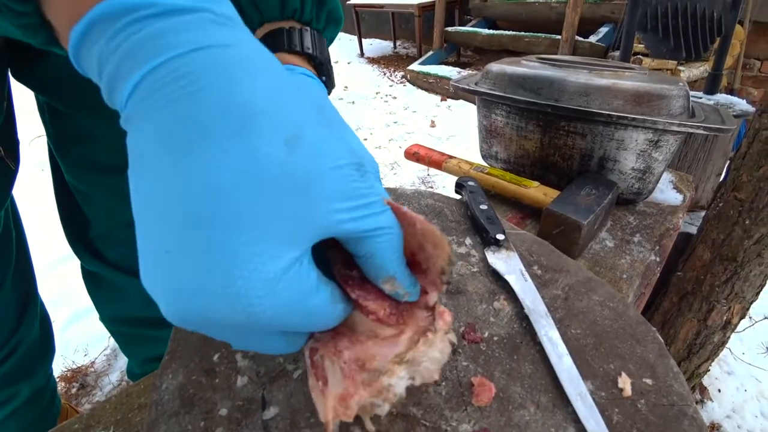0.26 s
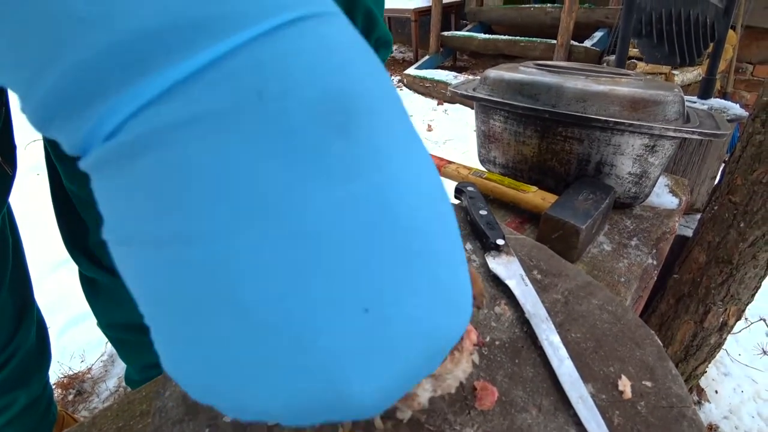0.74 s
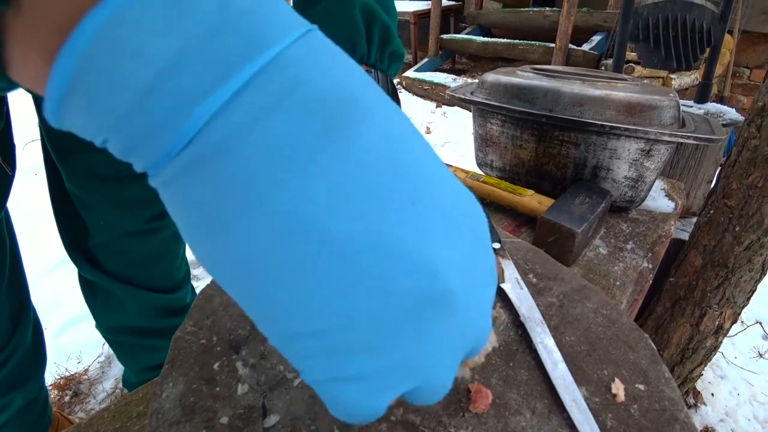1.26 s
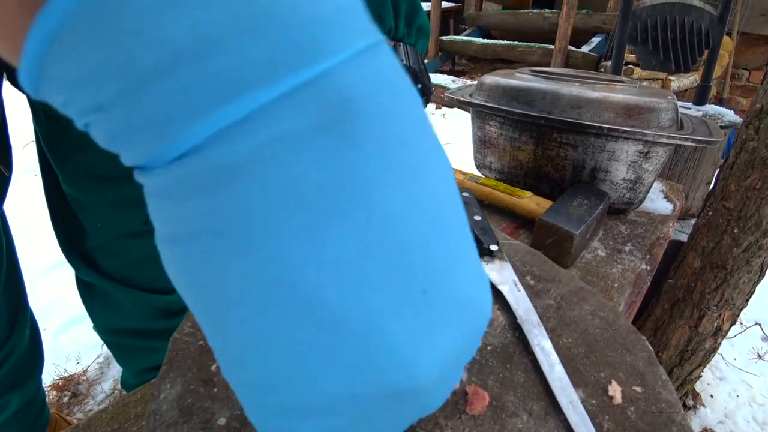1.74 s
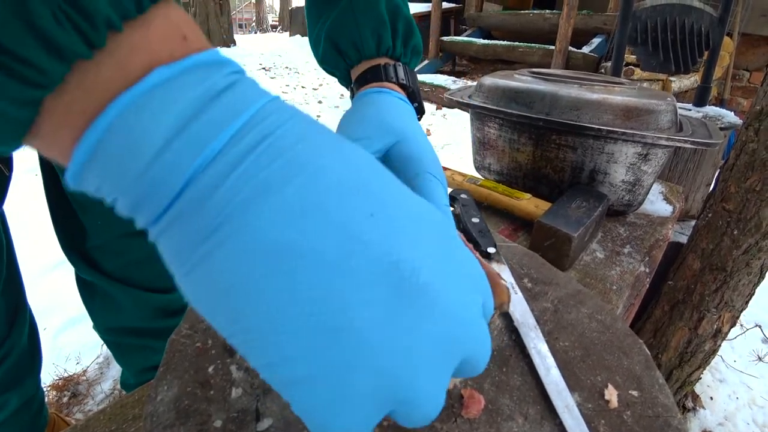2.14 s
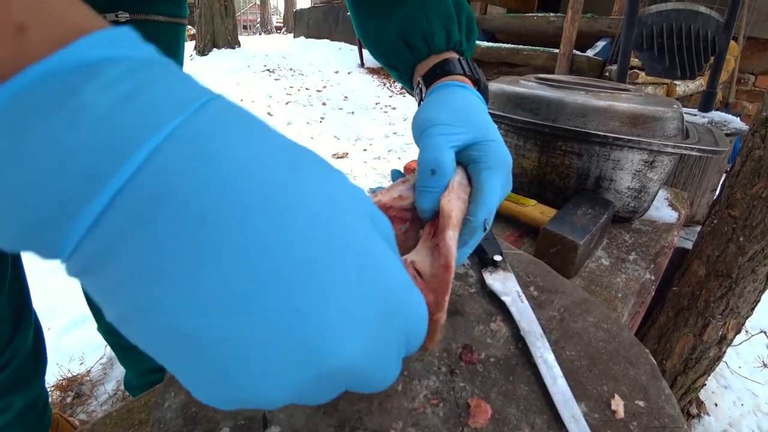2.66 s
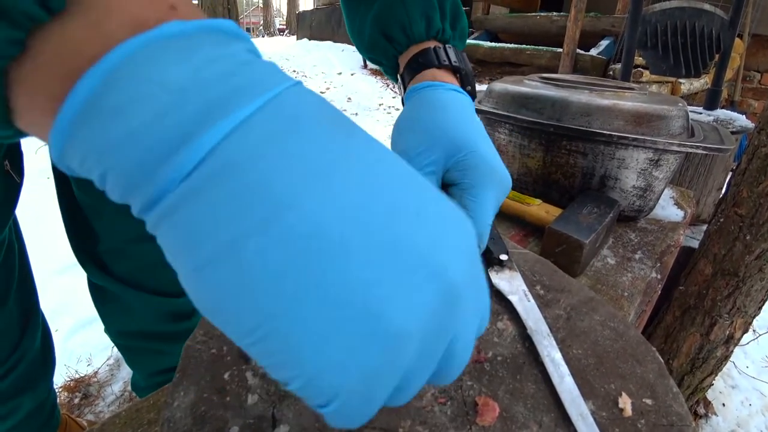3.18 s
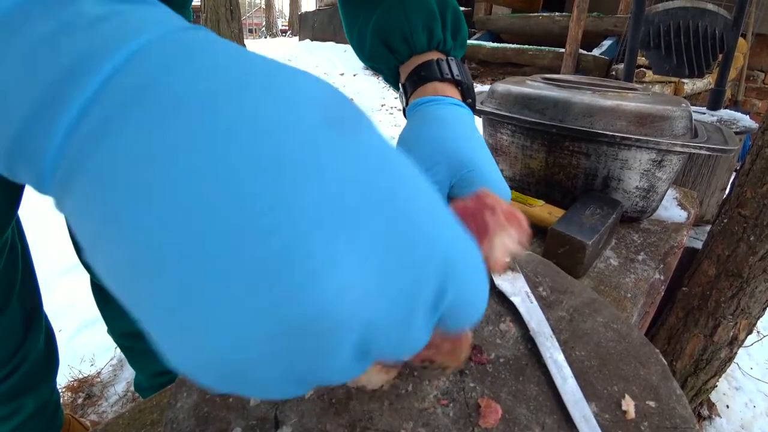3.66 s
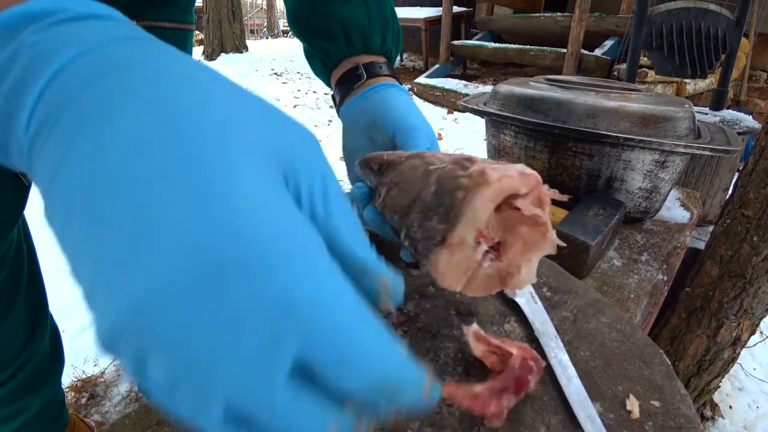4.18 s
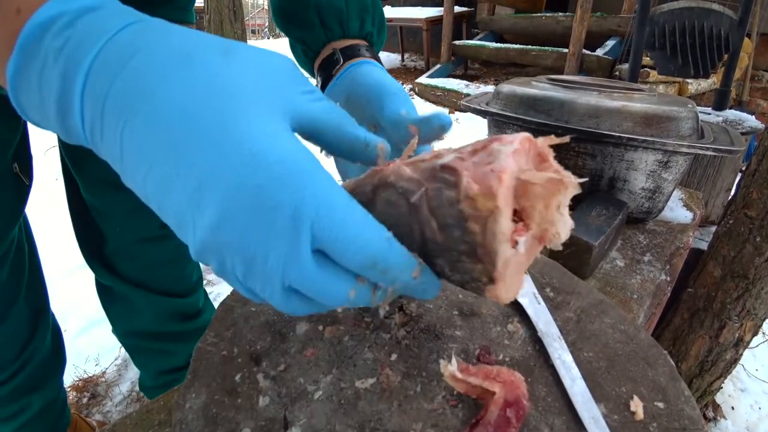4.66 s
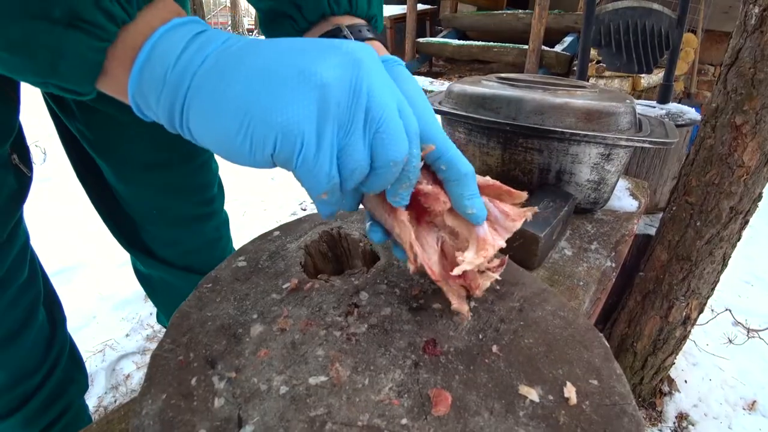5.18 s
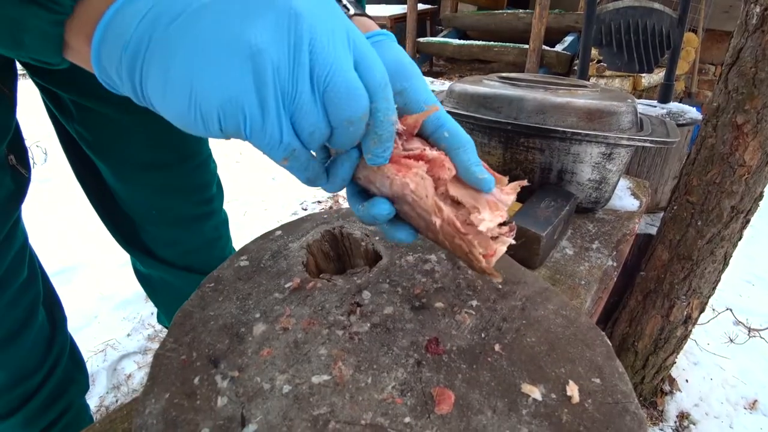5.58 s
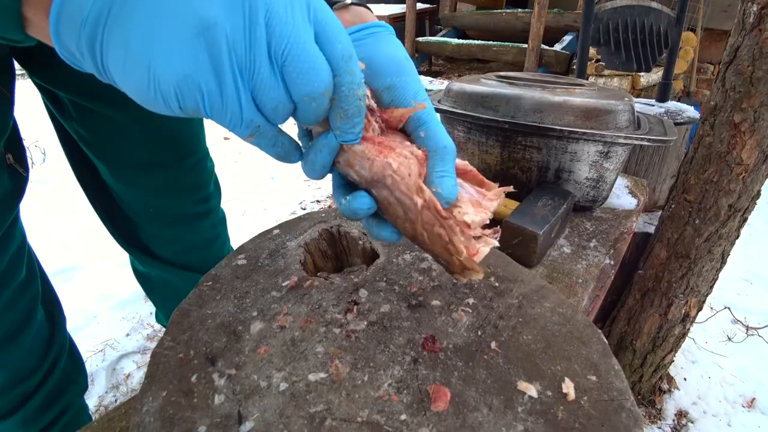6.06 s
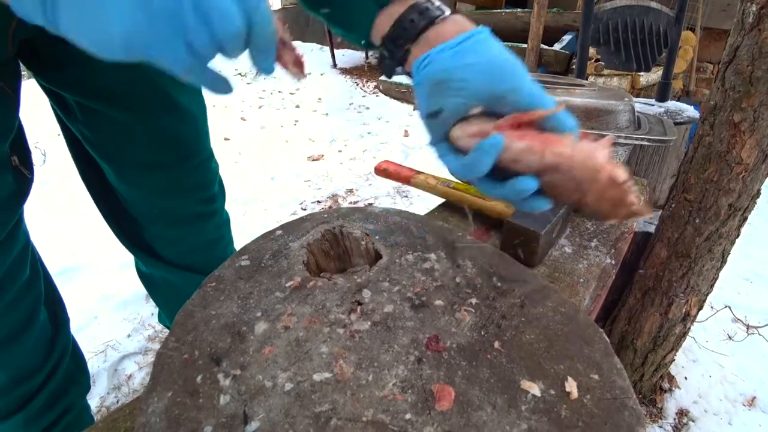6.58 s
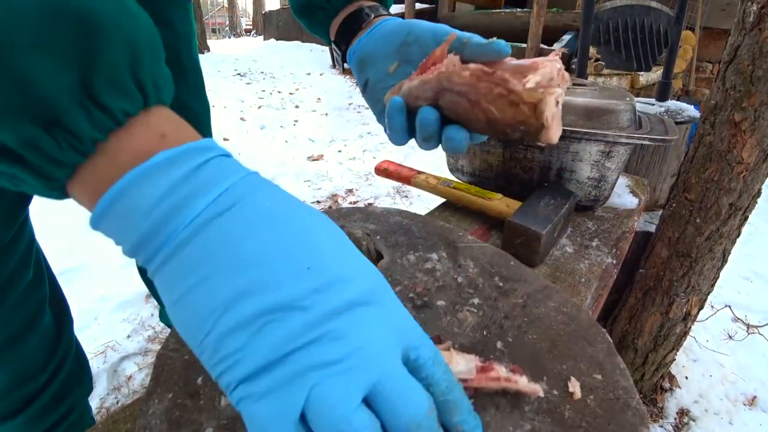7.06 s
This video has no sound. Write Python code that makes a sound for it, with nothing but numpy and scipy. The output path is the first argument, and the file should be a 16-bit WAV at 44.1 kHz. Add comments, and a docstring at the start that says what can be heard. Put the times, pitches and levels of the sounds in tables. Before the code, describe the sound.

Very close stereo sound of rubber-gloved hands pulling half-frozen fish apart outdoors. Short rubbing strokes and icy crackles mix with sharp snaps; a strip rips free halfway with a heavy wet thud, followed by a woody knock. Finer crackling continues until a second, brighter rip, then a last piece slaps onto the stump. Quiet yard wash lies behind, with hardly any echo.

```python
"""Pulling apart a half-frozen fish

Gloved hands pull a half-frozen fish apart over a wooden stump outdoors, close to the microphone.
Rubbing is tilted noise with ice ticks; fibres snap as scattered pulses, and twice a strip rips free.
Pieces thud as damped wood modes on the stump, which rocks with a low hum. Narrow noise swells as gloves
and cloth drag and the fish's body resonates; gloves squeak as fuzzy gliding tones. A sleeve rustles
nearby over the faint wash of the yard, both of them coloured noise."""
import sys
import numpy as np
from scipy import signal
from scipy.fft import rfft, irfft
from scipy.io import wavfile
from scipy.ndimage import uniform_filter1d

SR = 44100
rng = np.random.default_rng(int(sys.argv[2]) if len(sys.argv) > 2 else 0)


def generate_wav(sig):
    """Save sig (samples, or channels by samples) to the path in sys.argv[1] as 16-bit PCM at SR."""
    pcm = np.round(np.clip(np.atleast_2d(sig).T, -1, 1) * 32767).astype(np.int16)
    wavfile.write(sys.argv[1], SR, pcm)


N = 322812

# stereo likeness of the close noise layers: pitch_hz, likeness (1 = same left and right)
NEAR_SAME = [(100, 1), (300, 0.75), (700, 0.44), (1400, 0.75), (3000, 0.96), (7000, 1), (11000, 0.77),
             (15000, 0.39)]


def amp(db):
    """Decibels to gain."""
    return 10 ** (np.asarray(db) / 20)


def unit(x):
    """Scales to rms 1."""
    return x / np.sqrt(np.mean(x ** 2) + 1e-20)


def read(points, hz):
    """A spectrum, joined by straight lines on a log-frequency axis."""
    f, value = np.transpose(points)
    return np.interp(np.log(hz + 1), np.log(f + 1), value)


def follow(rows, t):
    """The columns of a curve at the times t."""
    s, *columns = np.transpose(rows)
    return [np.interp(t, s, c) for c in columns]


def add(mix, s, sound):
    """Mixes a sound in at the time s."""
    part = mix[:, max(round(s * SR), 0):][:, :sound.shape[-1]]
    part += sound[..., :part.shape[1]]


def causal(db):
    """The sharpest pulse that has this spectrum (minimum phase), floored 70 dB under its peak."""
    log_gain = np.log(amp(np.maximum(db, db.max() - 70)))
    circle = np.r_[log_gain, log_gain[-2:0:-1]]
    return np.fft.ifft(np.exp(np.conj(signal.hilbert(circle)))).real


def pair(x, db, same):
    """Colours two unrelated signals and blends them into partly alike left and right channels."""
    hz = np.fft.rfftfreq(N, 1 / SR)
    likeness = np.clip(read(same, hz), -1, 1)
    mid, side = rfft(x) * np.sqrt([1 + likeness, 1 - likeness]) * amp(db(hz))
    return unit(irfft([mid + side, mid - side], N))


def rubbing(rub_db, bright, level_db=-2.0, judder_db=2.0):
    """Countless tiny slips make a juddering hiss; strained flesh adds separate ticks of ice."""
    # how hard the flesh is strained: time_s, crackle_db (relative to the hiss)
    strain = [(0, 1.5), (.25, -8), (.55, 2), (1.15, -4.5), (1.6, -1), (1.85, -14), (2.05, 2), (2.65, -12.5),
              (3.05, -1.5), (3.25, -9), (3.43, 5), (3.55, -13), (4.0, -2), (4.7, -10.5), (5.1, 1),
              (5.7, -3.5), (6.45, 0.5), (6.62, -5.5)]
    # tone of glove on flesh: pitch_hz, relative_db
    rub_colour = [(150, -42), (500, -16.5), (900, -17), (1260, -13), (1700, -8), (2500, -6), (3500, -3),
                  (5550, -2.5), (6400, -1), (7400, -2), (9000, -8), (12000, -8.5), (15000, -17.5),
                  (16000, -21)]
    crackle_db, = follow(strain, np.arange(N) / SR)
    colour = lambda hz: read(rub_colour, hz)
    judder = amp(judder_db * unit(uniform_filter1d(rng.standard_normal(N), 160)))
    hiss = pair(rng.standard_normal((2, N)) * judder, colour, NEAR_SAME)
    ice = ticks()
    ice = pair(np.array([ice, ice * rng.standard_normal(N)]), colour, NEAR_SAME)
    return amp(rub_db + level_db) * slope(hiss + amp(crackle_db) * ice, bright)


def sliding(t):
    """Level and brightness of the hands: creeping grip, arched strokes, and rips that swell and let go."""
    # creep between strokes: time_s, level_db (before layer trims), brightness_db_per_octave
    grip = [(0, -45.5, 1.5), (.7, -48.5, -3), (1.0, -49, -1.5), (1.3, -45, -0.5), (1.75, -51, -2.5),
            (2.5, -48, 0), (3.35, -47, 0.5), (3.9, -59.5, 2), (4.45, -56, 2), (4.7, -51.5, 2),
            (4.85, -43.5, 1), (5.35, -45, 0.5), (5.55, -52.5, 4.5), (5.7, -47, 4.5), (6.5, -46, 3.5),
            (6.7, -48, 1.5), (7.0, -52, .5), (7.3, -58, -1)]
    # strokes of a glove over flesh: middle_s, length_s, level_db (before layer trims),
    # brightness_db_per_octave
    strokes = [(0.01, 0.069, -38.5, -3.5), (0.309, 0.094, -40, -2), (0.422, 0.085, -39, 0),
               (0.519, 0.08, -36, 2), (0.65, 0.061, -33, .5), (0.878, 0.12, -42.5, -3),
               (1.127, .07, -41.5, -0.5), (1.2, 0.27, -47, 2), (1.364, 0.065, -37.5, -3),
               (1.423, 0.051, -34, -3), (1.469, 0.046, -39.5, -3), (1.608, 0.11, -44, -1),
               (1.669, 0.072, -41, -3), (1.84, 0.17, -47.5, 1.5), (2.005, 0.086, -40, -.5),
               (2.092, 0.057, -37.5, -1.8), (2.147, .06, -41.5, -0.5), (2.24, 0.052, -37.5, -2),
               (2.289, 0.075, -41, -0.5), (2.383, 0.016, -38, -2), (2.628, .1, -43.5, 3),
               (2.767, 0.079, -35, .3), (2.814, 0.066, -36, .7), (2.955, 0.061, -39.5, -0.5),
               (3.046, 0.028, -35.5, -3.5), (3.112, 0.046, -43.5, 3), (3.29, 0.074, -38.5, -1.5),
               (3.42, 0.086, -39.5, 0), (3.475, 0.075, -34.5, 1.5), (3.638, 0.11, -36.5, -1),
               (3.85, 0.058, -46.5, 1), (4.094, 0.22, -49, 1.2), (4.434, 0.022, -41.5, 4.5),
               (4.505, 0.026, -35, 1.5), (4.585, 0.097, -37, 0), (4.734, 0.042, -32, 4),
               (4.919, .06, -39.5, 2.5), (5.257, 0.089, -42.5, 3), (5.451, 0.11, -35, 1),
               (5.608, .08, -40, 0.5), (5.89, 0.23, -42, 3), (6.424, 0.14, -40, 4.5),
               (6.497, 0.073, -40, 3), (7.075, 0.089, -41, -0.5), (7.142, .03, -30, -1)]
    # strips ripping free: peak_s, hold_s, level_db (before layer trims), brightness_db_per_octave
    rips = [(3.531, 0.006, -20.5, 0.5), (6.597, 0.019, -20, 3.5)]
    edge_drop_db, arch_exponent = 10, 1.63  # a stroke is this much weaker at its ends
    rise_db_per_s, fall_db_per_s = 463, 902  # of a rip
    parts = [follow(grip, t)]
    for s, length, db, bright in strokes:
        away = np.minimum(abs(t - s) / (length / 2), 4)
        parts.append((db - edge_drop_db * away ** arch_exponent, bright))
    for s, hold, db, bright in rips:
        rise = rise_db_per_s * np.maximum(s - t, 0)
        fall = fall_db_per_s * np.maximum(t - s - hold, 0)
        parts.append((db - rise - fall, bright))
    power = sum(amp(db) ** 2 for db, _ in parts)
    # the loudest part weighs most in the brightness
    mean_bright = sum(amp(db) ** 2 * bright for db, bright in parts) / power
    return 10 * np.log10(power), mean_bright


def motion(count=4000):
    """The sliding of the hands at every sample: level_db, brightness_db_per_octave."""
    t = np.linspace(0, N / SR, count)
    return follow(np.transpose([t, *sliding(t)]), np.arange(N) / SR)


def slope(x, octave_db, pivot_hz=5500, patch_db=1.7):
    """Tilts the spectrum over time, keeping the power; the shifting grip adds passing resonances."""
    hz, t, z = signal.stft(x, SR, nperseg=256)
    patches = uniform_filter1d(rng.standard_normal((len(t), len(hz))), size=12, axis=0)
    patches = unit(uniform_filter1d(patches, size=5, axis=1)).T
    octaves = np.log2(np.clip(hz, 1500, 11000) / pivot_hz)[:, None]
    tilt_db = octaves * np.interp(t * SR, np.arange(N), octave_db)
    gain = amp(tilt_db + patch_db * patches)
    power = (abs(z) ** 2).mean((0, 2))[:, None]
    keep_power = np.sqrt(power.sum() / (power * gain ** 2).sum(0))
    return signal.istft(z * gain * keep_power, SR, nperseg=256)[1][:, :N]


def ticks(per_s=520, size_db=5.5, cycles=1.6, scatter_db=-4, scatter_t60=0.018, count=48):
    """Ice crystals giving way: brief rings of many pitches, mostly small, each scattered by the hands."""
    sizes = amp(size_db * np.minimum(rng.exponential(1, N), 3.5)) * (rng.random(N) < per_s / SR)
    kind, t, out = rng.integers(0, count, N), np.arange(600) / SR, np.zeros(N)
    for k, hz in enumerate(np.geomspace(2200, 12000, count)):
        ring = np.sin(2 * np.pi * hz * t) * np.exp(-t * hz / cycles)
        tail = rng.standard_normal(len(t)) * amp(-60 * t / scatter_t60)
        scatter = np.convolve(ring, tail)[:len(t)]
        tick = np.sqrt(hz) * (unit(ring) + amp(scatter_db) * unit(scatter))
        out += signal.oaconvolve(sizes * (kind == k), tick)[:N]
    return out


def snaps(scatter_db=-6, scatter_t60=0.0095, ring_t60=0.016, dull_db=1, skirt_db=8, wander_db=3.0):
    """Each break is one sharp pulse, scattered by the hands and followed by a dull ring of the flesh."""
    # fibres, small bones and ice breaking: start_s, level_db (of the pulse, over 1 ms), centre_hz,
    # spread_octaves, flesh_ring_db (relative to the pulse)
    breaks = [(0.067, -29.5, 11000, .68, -15), (0.0775, -20, 7660, 0.74, -14),
              (0.0839, -25, 3700, 1.9, -16), (0.418, -30, 7960, 1.3, -2), (0.528, -21.5, 4970, 0.79, -27),
              (0.9245, -27, 4040, 1.5, -3), (1.1139, -30.5, 5500, 0.43, -19),
              (1.1724, -30.5, 5000, 0.35, -22), (1.354, -22, 5930, 1.1, -24),
              (1.3675, -20, 4830, 0.32, -30), (1.4025, -23.5, 2600, 1.15, -2),
              (1.4073, -20.5, 3590, 1.3, -21), (1.411, -21, 5560, 0.68, -24),
              (1.466, -19.9, 4470, 0.23, -15), (1.513, -30.5, 4420, 1.4, -9),
              (1.773, -36.5, 2680, 1.1, -3.5), (1.9204, -30.5, 4060, 0.61, -24),
              (1.994, -29.5, 4370, 0.38, -16), (2.015, -15.5, 3960, 0.43, -7),
              (2.0244, -32, 4550, .25, -24), (2.0352, -28.5, 4420, 2, -15),
              (2.1794, -15.5, 4400, 0.55, -11.5), (2.1814, -24, 3900, 0.41, -14),
              (2.205, -30.5, 4970, .67, -16), (2.4394, -33, 6870, 1.9, -11), (3.0393, -24.8, 5120, 1.8, -8),
              (3.0434, -26, 2600, 1.8, -4), (3.177, -34, 7730, 0.8, -24), (3.3971, -23, 4290, .68, -24),
              (3.4014, -19, 5500, 0.88, -21), (3.4255, -15.5, 3680, .17, -23),
              (3.4286, -19, 4650, .71, -18), (3.4617, -19, 4680, .52, -18),
              (3.4705, -15.5, 6250, 0.4, -12.5), (3.487, -19, 7730, .93, -16),
              (3.4996, -17.5, 5430, .47, -10), (3.7455, -35, 8400, 0.85, -21), (3.836, -37, 4820, .62, -26),
              (4.013, -34, 5400, 0.61, -13), (4.1736, -26.5, 4550, 0.62, -22), (4.3435, -35, 4200, .88, -8),
              (4.835, -20, 2500, 1.23, -14), (4.849, -29.3, 4680, 1.3, -8.5),
              (4.922, -26.5, 7960, 0.88, -11.5), (4.9921, -31, 5270, .76, -22),
              (5.07, -25, 7400, 0.47, -14), (5.2143, -26, 5120, 0.48, -22),
              (5.2551, -27.5, 10370, 1.5, -20), (5.2899, -22, 6400, 1, -11.5),
              (5.4565, -17.5, 5200, 1.1, -26), (5.4892, -25, 7500, 1.2, -16),
              (5.5742, -21.5, 10370, 0.93, -18), (5.5858, -21, 8440, 0.56, -24),
              (5.784, -23, 10680, 1.9, -14), (5.8194, -23.5, 4680, 1.1, -14), (5.8714, -29, 5760, .44, -11),
              (5.8805, -20, 6110, 0.96, -16), (5.8989, -23, 8200, 0.85, -14),
              (6.03, -31.5, 9400, 0.45, -22), (6.282, -31.5, 8150, .39, -29), (6.3482, -31, 5760, .95, -14),
              (6.369, -22, 7000, 0.25, -33), (6.3777, -19, 7100, 0.55, -19), (6.5626, -13, 6500, 0.35, -8),
              (6.5687, -16.5, 4900, 1.05, -16), (6.575, -21, 6300, .3, -18),
              (6.7167, -16.5, 5800, .77, -11.5), (6.9538, -35, 5270, 1.4, -24),
              (7.0515, -27.5, 10680, 1.8, -14)]
    # presence peaks that every sharp pulse takes on at the microphone: pitch_hz, relative_db
    presence = [(300, -1), (900, -13), (2000, -3.5), (4200, 1), (5600, -2.5), (7300, 3.5), (9000, -0.5),
                (11500, 1), (14000, -4.5), (16000, -12)]
    flesh_hz, ring_octaves = 2003, 0.18
    left_db, left_db_per_octave = 1.3, 2.5  # the higher a break, the further left it tends to lie
    out, hz, t = np.zeros((2, N)), np.fft.rfftfreq(512, 1 / SR), np.arange(1400) / SR
    for s, db, centre_hz, spread, ring_db in [*breaks, *fibres()]:
        pan_db = left_db + left_db_per_octave * np.log2(centre_hz / 5500)
        pan_db += wander_db * rng.uniform(-1.4, 1)
        ring_hz = flesh_hz * 2 ** (ring_octaves * rng.uniform(-1.18, 1))
        away = np.log2((hz + 50) / centre_hz) / max(spread, .15)
        pulse = causal(read(presence, hz) - skirt_db * (np.sqrt(1 + 2 * away ** 2) - 1))
        pulse /= np.linalg.norm(pulse)
        # one shared noise plus one for each side
        noise = rng.standard_normal((2, 3, len(t)))
        scatter, dull = noise[:, :1] + noise[:, 1:]
        scatter = signal.fftconvolve(scatter * amp(-60 * t / scatter_t60), pulse[None])[:, :len(t)]
        # the flesh has one damped mode among many blurred ones
        blur_band = signal.butter(2, [ring_hz / 2, ring_hz * 1.31], "band", fs=SR)
        dull = unit(signal.lfilter(*blur_band, dull))
        ring = (np.sin(2 * np.pi * ring_hz * t) + amp(dull_db) * dull) * amp(-60 * t / ring_t60)
        snap = amp(scatter_db) * scatter / np.linalg.norm(scatter[0])
        snap += amp(ring_db) * ring / np.linalg.norm(ring[0])
        snap[:, :len(pulse)] += pulse
        millisecond = SR / 1000  # in samples
        sides_db = db + np.array([[pan_db], [-pan_db]]) / 2
        add(out, s, snap * np.sqrt(millisecond) * amp(sides_db))
    return out


def fibres(uneven_db=3.0, pitch_octaves=0.49, count=5):
    """Each tear is a short, uneven run of small breaks; returns rows like those of the single breaks."""
    # fibres giving way one after another: start_s, length_s, fibre_level_db (mean), centre_hz (middle)
    tears = [(1.37, .011, -26.5, 3420), (1.417, .018, -26.5, 3530), (1.469, .02, -30.5, 4600),
             (3.383, 0.047, -32, 3740), (3.474, 0.011, -29, 4800), (5.201, 0.095, -31, 5970),
             (5.574, 0.011, -31, 8650), (6.387, .085, -33.5, 7000), (6.591, .007, -18, 6560)]
    spread_octaves, flesh_ring_db = 0.49, -16
    rows = []
    for s, length, db, hz in tears:
        for k, (late, size, pitch) in enumerate(rng.uniform(-1, 1, (count, 3))):
            start_s = s + length * (k + .5 + late / 2) / count
            centre_hz = hz * 2 ** (pitch_octaves * pitch)
            rows.append((start_s, db + uneven_db * size, centre_hz, spread_octaves, flesh_ring_db))
    return rows


def stump(soft_db=5, squash_db=-14, squash_t60=0.055, slap_s=0.0045, push_hz=165, push_t60=0.028):
    """A soft blow rings the wood around its contact pitch; the flesh pushes, squashes and slaps."""
    # pieces landing: start_s, level_db (of wood and squash), contact_hz, rocking_db, wet_slap_db,
    # weight_push_db
    thuds = [(1.141, -38.5, 680, -70, -65, -56), (3.54, -16, 382, -32, -32, -15),
             (3.555, -29, 280, -62, -60, -34), (4.174, -15, 700, -43.5, -57, -25.5),
             (4.1832, -35, 760, -60, -56, -38), (4.343, -34.5, 398, -46, -53, -33),
             (4.416, -35, 480, -53, -53, -36.5), (4.434, -37, 650, -61, -52, -48),
             (7.1323, -18.5, 596, -38, -32, -29)]
    # modes of the damp wood under the fish: pitch_hz, relative_db, t60_s
    wood = [(198, -14, 0.077), (280, -16, 0.085), (382, -7, 0.06), (446, -4, 0.047), (535, -8.5, 0.034),
            (625, -5, 0.031), (727, -10.5, 0.035), (882, -16.5, 0.031), (1070, -14, 0.029)]
    # hands leaning on the stump: start_s, rocking_db
    leans = [(0.0, -44), (0.429, -46), (0.722, -49.5), (2.22, -47), (2.96, -44.5)]
    out, t = np.zeros((2, N)), np.arange(SR // 4) / SR
    slap_band = signal.butter(2, [1000, 8000], "band", fs=SR)
    side_turn = np.array([[.36], [-.36]])  # radians: higher modes reach the two sides out of step
    push = np.sin(2 * np.pi * push_hz * t) * amp(-60 * t / push_t60)
    for s, db, contact_hz, rock_db, slap_db, weight_db in thuds:
        ring = 0
        for k, (hz, mode_db, t60) in enumerate(wood):
            decay_db = mode_db - soft_db * np.log2(hz / contact_hz) ** 2 - 60 * t / t60
            sign = (-1) ** ((k + 1) // 2)
            ring = ring + sign * amp(decay_db) * np.sin(2 * np.pi * hz * t + side_turn * min(hz / 450, 1))
        noise = rng.standard_normal((2, 3, len(t)))
        squash, slap = noise[:, :1] + 0.89 * noise[:, 1:]
        squash_band = signal.butter(3, [contact_hz / 3, contact_hz * 1.61], "band", fs=SR, output="sos")
        squash = unit(signal.sosfilt(squash_band, squash)) * amp(squash_db - 60 * t / squash_t60)
        blow = amp(db) * (ring + squash) + amp(weight_db) * push
        add(out, s, blow * (1 - np.exp(-t / 0.0013)))  # soft onset
        slap_swell = t / slap_s * np.exp(1 - t / slap_s)
        add(out, s, amp(slap_db) * unit(signal.lfilter(*slap_band, slap)) * slap_swell)
        add(out, s, rocking(rock_db))
    for s, rock_db in leans:
        add(out, s, rocking(rock_db))
    return out


def rocking(db, sway_hz=70.2, sway_t60=0.58):
    """The whole stump sways on its base: a low, decaying sine."""
    t = np.arange(SR) / SR
    swing_up = 1 - np.exp(-t / .007)
    return amp(db - 60 * t / sway_t60) * np.sin(2 * np.pi * sway_hz * t) * swing_up


def narrow_swells(width=0.19):
    """Short and longer swells of narrow noise: dragging gloves, cloth, the hollow ring of the fish's body."""
    # drags, and near 1.8 kHz the resonance of the body cavity: middle_s, length_s, pitch_hz,
    # level_db (rms before the swell)
    swells = [(0.128, 0.12, 1360, -55.5), (1.414, 0.14, 530, -57), (1.985, 0.056, 240, -56.5),
              (2.241, 0.073, 130, -52.5), (2.718, 0.065, 225, -56), (2.823, 0.22, 1130, -55),
              (2.881, 0.2, 186, -55), (3.529, 0.046, 840, -42), (3.528, 0.044, 128, -48),
              (5.049, .45, 1910, -58.5), (5.858, 0.27, 1810, -58), (6.399, 0.34, 1770, -58),
              (6.592, 0.064, 1810, -39.5), (6.607, 0.038, 130, -52), (6.601, 0.09, 513, -50)]
    out = np.zeros((2, N))
    for s, length, hz, db in swells:
        noise = rng.standard_normal((3, SR // 2))[:, :round(length * SR)]
        band = signal.butter(2, [hz / (1 + width), hz * (1 + width)], "band", fs=SR, output="sos")
        narrow = unit(signal.sosfilt(band, noise[:1] + .5 * noise[1:]))
        add(out, s - length / 2, amp(db) * narrow * np.hanning(noise.shape[1]))
    return out


def squeaks(cutoff_hz=110):
    """Rubber sticks and slips on the skin: a fuzzy tone that glides from a first to a last pitch."""
    # gloves on skin: start_s, length_s, first_hz, last_hz, level_db (rms before the swell)
    slips = [(0.93, 0.16, 1230, 1480, -53), (6.405, .07, 5600, 5300, -43)]
    out = np.zeros((2, N))
    lowpass = signal.butter(2, cutoff_hz, fs=SR, output="sos")
    for s, length, first_hz, last_hz, db in slips:
        size = round(length * SR)
        # two slow noises turn the tone fuzzy
        a, b = signal.sosfilt(lowpass, rng.standard_normal((2, SR // 2)))[:, :size]
        turn = 2 * np.pi * np.cumsum(np.linspace(first_hz, last_hz, size)) / SR
        tone = unit(a * np.cos(turn) + b * np.sin(turn))
        add(out, s, amp(db) * tone * np.hanning(size))
    return out


def sleeve(rub_db, level_db=-0.5, lumpy_db=3):
    """Dull, lumpy rustle of cloth that follows the hands while the near arm pulls."""
    # how close the pulling arm is to the microphone: time_s, rustle_db (relative to the hands, untrimmed)
    arm = [(0, -11), (.4, -13), (.6, -17.5), (1.45, -17.5), (1.67, -7.5), (2.0, -22), (2.24, -10.5),
           (2.45, -29), (2.95, -11.5), (3.5, -19), (3.9, -36)]
    # tone of the cloth: pitch_hz, relative_db
    sleeve_colour = [(60, -5), (200, -5), (330, -6.5), (440, -3), (700, -5.5), (1000, -3.5), (2000, -11),
                     (4000, -40)]
    near_db, = follow(arm, np.arange(N) / SR)
    lumps = amp(lumpy_db * np.tanh(unit(uniform_filter1d(rng.standard_normal(N), 500))))
    cloth = pair(rng.standard_normal((2, N)) * lumps, lambda hz: read(sleeve_colour, hz), NEAR_SAME)
    return cloth * amp(rub_db + near_db + level_db)


def echoes(x, wet_db=-21, t60=0.11):
    """Weak reflections from the stump, the pot and the woodpile: sparse, decaying random taps."""
    t = np.arange(SR // 4) / SR
    sparse = rng.random((2, len(t))) < .05
    taps = rng.standard_normal((2, len(t))) * sparse * amp(-60 * t / t60) * (t > .002)
    return amp(wet_db) * signal.fftconvolve(x, taps / np.linalg.norm(taps[0]), axes=1)[:, :N]


def yard(level_db=-55):
    """Faint steady outdoor wash: coloured noise with narrow microphone resonances."""
    # tone of the wash: pitch_hz, relative_db
    wash = [(12, -32), (20, 6.5), (83, -0.5), (434, -7), (873, -6.5), (1030, -3), (1260, -7), (1710, -7.5),
            (1960, -8), (2750, -18), (7310, -19), (9140, -18), (13200, -23), (14700, -25), (16000, -42)]
    # narrow microphone resonances in the background noise: pitch_hz, width_hz, boost_db
    peaks = [(1004, 75, 4), (1945, 39, 10), (2440, 70, 9)]
    # stereo likeness: pitch_hz, likeness (1 = same left and right)
    same = [(60, 1), (130, 0.82), (300, 0.089), (700, 0.033), (2000, 0.11), (7000, 0.24), (15000, 0.17)]

    def colour(hz):
        """The wash with its resonant peaks, in dB."""
        return read(wash, hz) + sum(db / (1 + (2 * (hz - f) / width) ** 2) for f, width, db in peaks)

    return amp(level_db) * pair(rng.standard_normal((2, N)), colour, same)


def scene():
    """The hands and the stump close by, their faint echoes, the sleeve and the yard."""
    # stereo lean of the rubbing: pitch_hz, left_minus_right_db
    balance = [(200, -3), (700, 4.5), (2400, -1), (4400, -0.2), (8000, 0), (10000, 5.5), (15000, -2.5)]
    rub_db, bright = motion()
    lean_db = read(balance, np.fft.rfftfreq(N, 1 / SR)) / 2
    hands = irfft(rfft(rubbing(rub_db, bright)) * amp([lean_db, -lean_db]), N)
    near = hands + snaps() + stump() + narrow_swells() + squeaks()
    return near + echoes(near) + sleeve(rub_db) + yard()


def record(dry, ceiling=.9, edge_hz=16000):
    """Rounds off the sharpest peaks by soft saturation and limits the band with a lowpass."""
    rounded = ceiling * np.tanh(dry / ceiling)
    lowpass = signal.firwin(301, edge_hz, window=("kaiser", 8), fs=SR)
    return signal.oaconvolve(rounded, lowpass[None], "same")


dry = scene()
out = record(dry)
generate_wav(out)
```